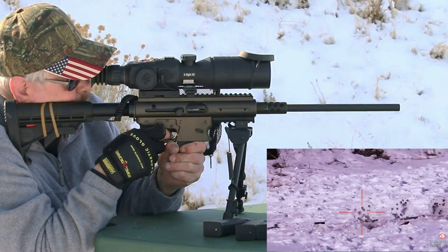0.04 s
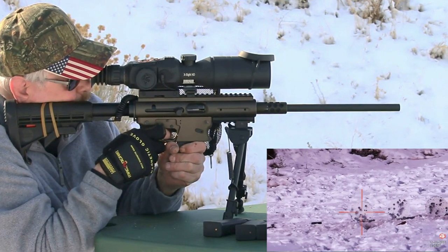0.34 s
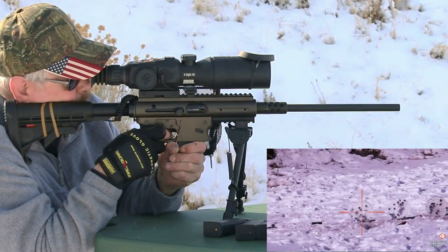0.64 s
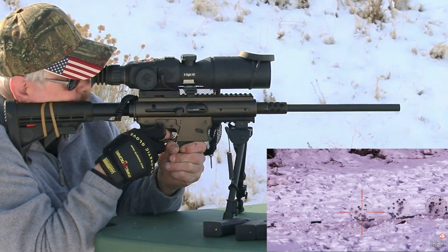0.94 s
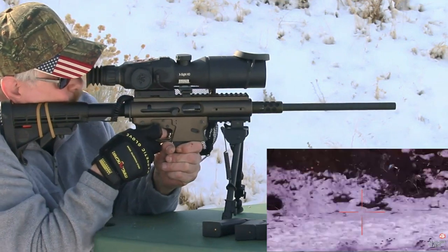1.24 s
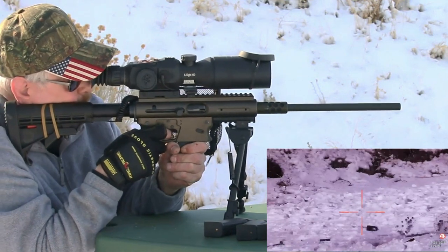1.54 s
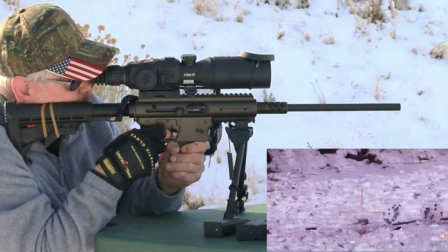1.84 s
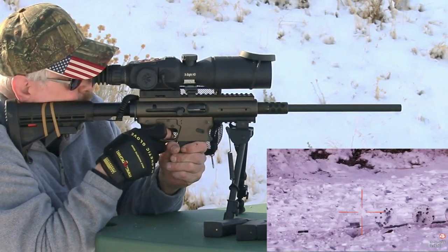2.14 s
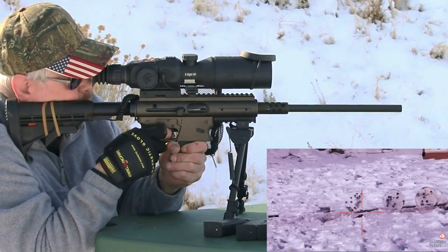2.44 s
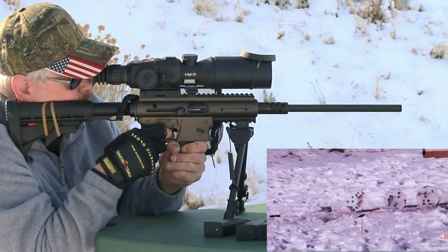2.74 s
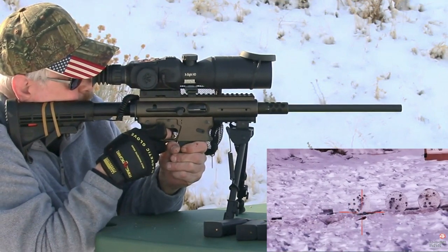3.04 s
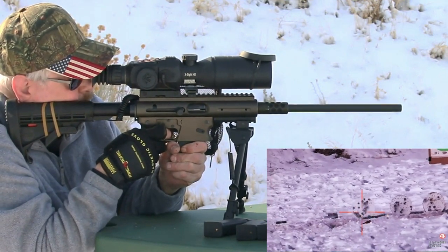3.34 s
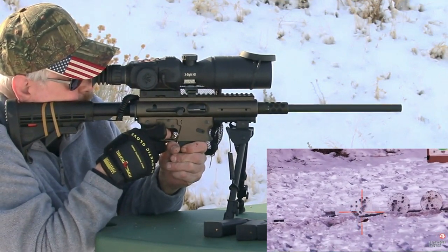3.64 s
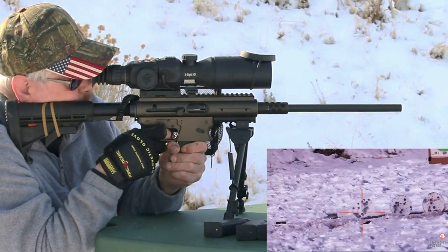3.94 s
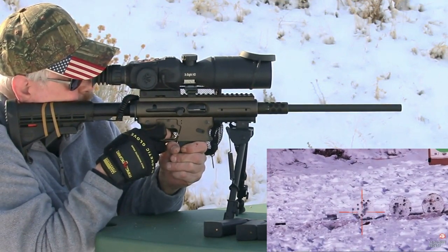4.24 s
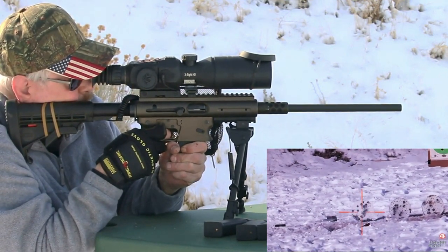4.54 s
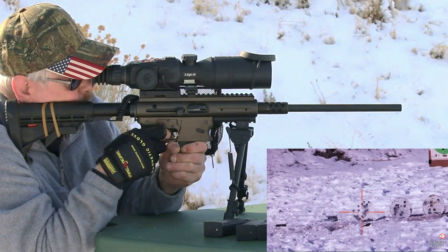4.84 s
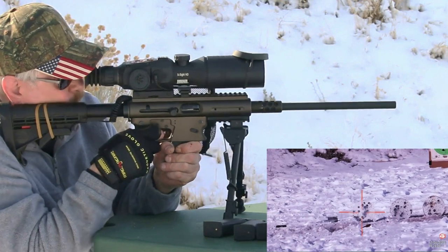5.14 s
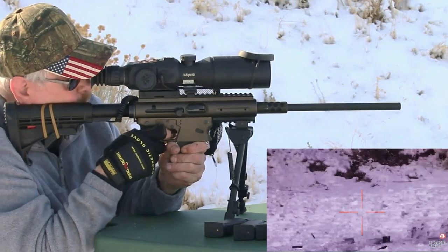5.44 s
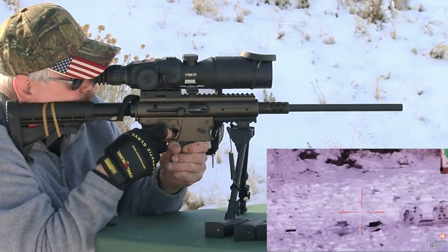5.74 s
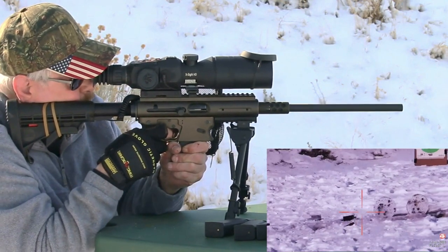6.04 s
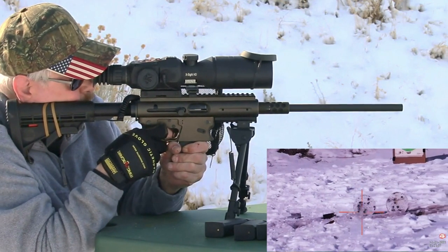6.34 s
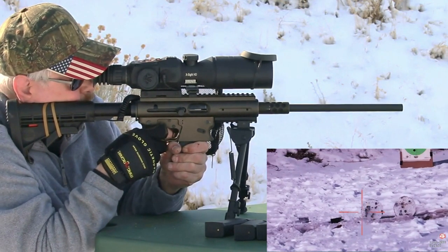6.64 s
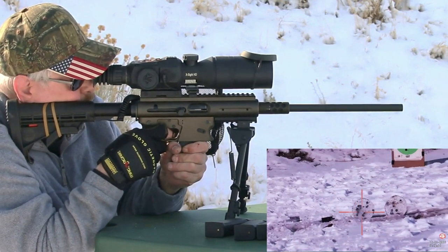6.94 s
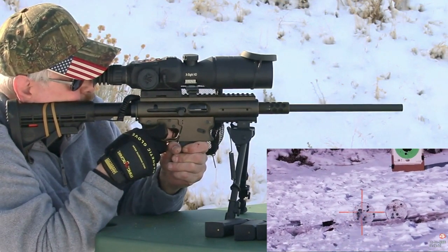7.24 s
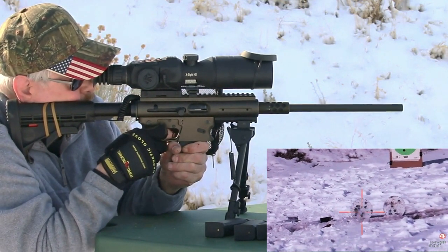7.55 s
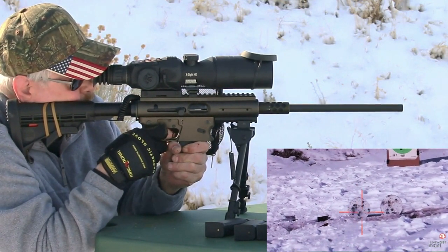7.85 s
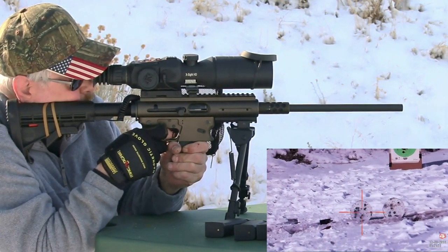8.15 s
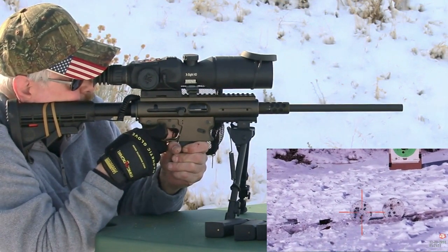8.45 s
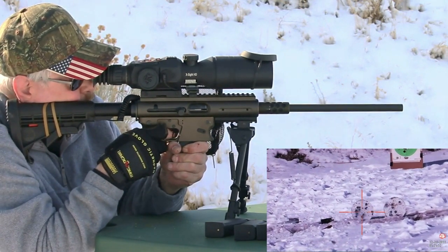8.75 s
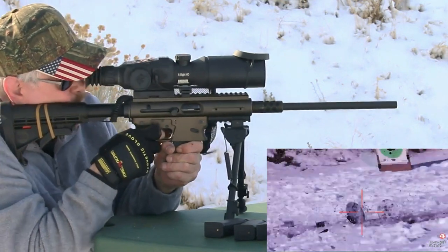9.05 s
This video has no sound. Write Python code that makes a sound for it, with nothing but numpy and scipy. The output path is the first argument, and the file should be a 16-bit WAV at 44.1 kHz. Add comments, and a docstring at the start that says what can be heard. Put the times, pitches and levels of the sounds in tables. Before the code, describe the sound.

Open country air and a faint, distant low drone sit under the high, pulsing ring of a steel target struck earlier. Light wind thumps on the microphone, mostly on the right. At about 1.2 seconds a close rifle fires with a sharp, overloading bang. The bullet cracks against the steel an instant later, a faint ricochet whines downward, and the echo slaps back and rumbles off the hills. The plate rings on, swelling and dipping about once a second. Wind puffs and soft handling clicks follow from 2 to 4.5 seconds. A second shot comes at 5.1 seconds, with the same echo, renewed ringing and a faint tinkle of metal. A small metallic clink sounds near 7.1 seconds. The third shot lands at about 9 seconds and sets the plate ringing loudest.

```python
"""Three shots on a snowy range

A carbine fires three times from a bench, overloading the microphone. Each bullet strikes a hanging
steel plate, fragments spatter, hard faces slap the bang back, and a slope and far hills roll it away.
The swinging plate rings with a slow beat, and is still singing from an earlier hit at the start.
Light wind puffs on the microphone over a far, low drone; between shots, handling makes soft clicks."""
import sys
import numpy as np
from scipy import signal
from scipy.fft import irfft, next_fast_len
from scipy.io import wavfile
from scipy.ndimage import map_coordinates

SR = 44100
rng = np.random.default_rng(int(sys.argv[2]) if len(sys.argv) > 2 else 0)


def master(y):
    """Save y as 16-bit WAV."""
    cut = np.clip(np.atleast_2d(y).T, -1, 1)
    pcm = np.round(cut * 32767)  # scale
    wavfile.write(sys.argv[1], SR, pcm.astype(np.int16))


N = 409248
TIME = np.arange(N) / SR


def amp(db):
    """Turn decibels into a gain. A fade time (t60) is the seconds a sound takes to drop 60 dB."""
    return 10 ** (np.asarray(db) / 20)


def unit(x):
    """Scale to an average (rms) level of 1."""
    return x / np.sqrt(np.mean(x ** 2) + 1e-20)


def along(points, hz):
    """Read between (Hz, value) points on a log scale."""
    f, v = np.transpose(points)
    return np.interp(np.log(hz + 1), np.log(f + 1), v)


def clock(seconds):
    """Sample times for about this many seconds."""
    return np.arange(next_fast_len(int(seconds * SR))) / SR


def wobble(t, rate):
    """A smooth curve through `rate` random values a second."""
    return map_coordinates(rng.standard_normal(4096), [t * rate], mode="wrap")


# How alike left and right sound. Each row: frequency in Hz, likeness (1 is identical).
LIKENESS = [(60, 0.89), (130, 1), (290, .98), (640, 0.93), (1410, 0.99), (3100, 0), (7000, 0.15),
            (15000, 0.72)]
def noise(t, gain, alike=LIKENESS):
    """Stereo noise with a given gain and likeness at each frequency."""
    hz = np.fft.rfftfreq(len(t), 1 / SR)
    turn = np.arccos(np.clip(along(alike, hz), -1, 1)) / 2
    phases = np.exp(2j * np.pi * rng.random((2, len(hz))))
    mid, side = irfft(phases * gain(hz) * [np.cos(turn), np.sin(turn)], len(t))
    return unit(np.array([mid + side, mid - side]))


def colour(points):
    """A tone shape from (Hz, dB) points."""
    return lambda hz: amp(along(points, hz))


def hump(centre_hz, octaves):
    """A tone shape with one broad peak."""
    return lambda hz: 1 / (1 + (np.log2((hz + 1) / centre_hz) / octaves) ** 2 / 2) ** 2


def add(out, s, sound):
    """Mix a sound in at s seconds."""
    start = round(s * SR)
    part = sound[:, max(-start, 0):max(N - start, 0)]
    out[:, max(start, 0):][:, :part.shape[1]] += part


# The air's tone. Each row: frequency in Hz, relative level in dB.
AIR_TONE = [(25, -11), (90, -6), (160, -17.5), (220, -7), (440, -9.5), (580, -6), (680, -7), (1000, -6),
            (1250, -12), (1900, -19.5), (11500, -27), (15500, -34)]
# The air's stereo width. Each row: frequency in Hz, left-right likeness.
AIR_LIKENESS = [(60, 1), (180, 0.66), (550, 0.92), (1650, 0.23), (4970, 0.085), (15000, 0.0)]
def open_air(db=-50):
    """The even rush of open country."""
    return noise(TIME, colour(AIR_TONE), AIR_LIKENESS) * amp(db + 0.4 * wobble(TIME, 2.5))


def drone(hz=185, start_db=-63, nearing_per_s=0.09):
    """A far, low drone grows as it comes nearer."""
    distance = np.maximum(1 - nearing_per_s * TIME, .1)
    return noise(TIME, hump(hz, 0.4)) * amp(start_db) / distance


# The breeze's tone. Each row: frequency in Hz, relative level in dB.
BREEZE_TONE = [(20, -10.5), (60, 7), (110, 0), (180, -14.5), (280, -24), (600, -45.5), (2000, -83)]
# Its rise and fall. Each row: time in seconds, relative level in dB.
BREEZE_LEVELS = [(0.0, -54), (1.47, -54), (1.6, -57), (2.22, -44), (2.56, -57.5), (2.82, -48.5),
                 (2.97, -47), (3.36, -50.5), (3.72, -58), (4.01, -50.5), (5.09, -48.5), (5.43, -56),
                 (5.66, -52.5), (7.39, -60), (8.58, -46), (9.28, -65)]
def breeze(boost_db=6, lump_db=2.5, sheltered_db=-15):
    """Wind rumbles on the microphone's right side; the left is sheltered."""
    rumble = noise(TIME, colour(BREEZE_TONE), [(100, .1)])
    db = np.interp(TIME, *np.transpose(BREEZE_LEVELS)) + boost_db + lump_db * wobble(TIME, 21)
    return rumble * amp(db) * amp([[sheltered_db], [0]])


# A puff's tone. Each row: frequency in Hz, relative level in dB.
PUFF_TONE = [(20, -15), (60, 4), (120, 3.5), (190, -7), (280, -23), (600, -54), (2000, -68.5)]
# The strongest puffs. Each row: peak time in seconds, level in dB, width in seconds.
PUFFS = [(0.311, -30.5, .009), (0.753, -20.5, .012), (2.129, -31.5, 0.053), (2.257, -25, 0.039),
         (3.183, -32, 0.041), (3.336, -29.5, 0.022), (3.505, -33.5, 0.038), (3.948, -35.5, 0.012),
         (4.109, -36.5, 0.069), (4.302, -34, 0.029), (7.779, -37, .03), (8.402, -21, 0.0057)]
def wind_puffs(sheltered_db=-22):
    """Swirls of air thud on the microphone, mostly on the right."""
    out, t = np.zeros((2, N)), clock(.5)
    middle = t[-1] / 2
    for s, db, width in PUFFS:
        swell = np.exp(-((t - middle) / width) ** 2 / 2)
        swirl = unit(noise(t, colour(PUFF_TONE), [(100, 0.62)]) * swell) * np.sqrt(np.mean(swell ** 2))
        add(out, s - middle, swirl * amp(db) * amp([[sheltered_db], [0]]))
    return out


# The plate's notes; close pairs flutter. Each row: pitch in Hz, relative level in dB, fade in seconds.
PLATE_NOTES = [(1315, -34.5, 8.93), (1319.0, -56.5, 8.1), (1340, -44.5, 9), (1846, -62, 1.2),
               (2093, -31.5, 1.3), (2410, -51, 1.7), (2552, -64, 1.7)]
# How it aims its ring, left then right. Each row: edge-on dip in dB, a power that delays the swell.
PLATE_AIM = [(-8, 2.1), (-18, 1.4)]
def plate(swing_hz=1.085, edge_on_s=0.836, doppler=.7, shimmer=.15, face_db=-2.5, earlier_hit_s=-2.664):
    """The struck steel rings as it swings, dipping each time it turns edge-on."""
    out, t = np.zeros((2, N)), clock(5)
    swing = swing_hz * (t - edge_on_s)
    facing = [amp(dip) + (1 - amp(dip)) * np.sin(np.pi * (swing % 1) ** late) for dip, late in PLATE_AIM]
    beam = amp(face_db) * np.array(facing) * (1 - np.exp(-t / .003))
    hits = [(s + delay, db) for s, _, db, delay, *_ in SHOTS]
    for s, hit_db in [(earlier_hit_s, 0)] + hits:
        # the swing and the moving air bend the notes, the high ones most
        bend = (doppler * np.sin(2 * np.pi * swing) + shimmer * wobble(t, 16)) / PLATE_NOTES[0][0]
        ring = sum(amp(db - 60 * t / t60) * np.sin(2 * np.pi * hz * t + bend * hz)
                   for hz, db, t60 in PLATE_NOTES)
        add(out, s, amp(hit_db) * beam * ring)
    return out


def hammer(db=-23, t60=.025):
    """The hammer snaps onto the firing pin."""
    t = clock(.03)
    return noise(t, hump(2500, 1.8)) * amp(db - 60 * t / t60) * (1 - np.exp(-t / 0.00077))


# The muzzle gas's tone. Each row: frequency in Hz, relative level in dB.
GAS_TONE = [(30, -8.5), (120, -13.5), (300, 3), (500, -12.5), (750, 5), (1500, -8), (2400, 0.5), (2900, -5),
            (3300, 0.5), (4800, -8), (6900, -11.5), (8500, -10.5), (15000, -28)]
def blast(bark_db=-3, bark_hz=760, bark_t60=0.027, thump_db=3, thump_hz=255, thump_t60=0.033):
    """Gas bursts from the muzzle over a hollow bark and a low thump."""
    t = clock(.06)
    gas = noise(t, colour(GAS_TONE), [(300, .97), (2000, .75), (8000, .55)]) * amp(13.5 - 60 * t / .0115)
    bark = noise(t, hump(bark_hz, 0.94)) * amp(bark_db - 60 * t / bark_t60)
    thump = np.sin(2 * np.pi * thump_hz * t + np.pi / 4) * amp(thump_db - 60 * t / thump_t60)
    return gas + bark + thump


# The nearest echo's tone. Each row: frequency in Hz, relative level in dB.
GROUND_TONE = [(40, -31), (120, -18.5), (285, -1), (600, -19.5), (1060, -0.5), (1380, -3), (1790, -15),
               (2400, -7), (5200, -17.5), (9000, -22.5), (15000, -30)]
def ground_echo(db=-16, hold_s=.031, t60=0.067):
    """The bang scatters off bench and ground, holds briefly, then dies."""
    t = clock(.2)
    fade = amp(db - 60 * np.maximum(t - hold_s, 0) / t60)
    return noise(t, colour(GROUND_TONE)) * fade * amp(0.5 * wobble(t, 400))


def roll(tone, fades, rise_s, lump_db, lump_rate):
    """Uneven land returns a lumpy echo; each frequency fades at its own speed."""
    t = clock(3)
    hz, age, bands = signal.stft(noise(t, colour(tone)), SR, nperseg=512)
    bands *= amp(-60 * age / along(fades, hz)[:, None])
    tail = signal.istft(bands, SR, nperseg=512)[1][:, :len(t)]
    return tail * (1 - np.exp(-(t / rise_s) ** 2)) * amp(lump_db * wobble(t, lump_rate))


# The slope's tone. Each row: frequency in Hz, relative level in dB.
SLOPE_TONE = [(50, -24), (150, -9.5), (290, 3.5), (480, -15.5), (800, -1.5), (1250, -2), (1800, -6.5),
              (2400, -5), (4000, -12.5), (8000, -19.5), (15000, -27.5)]
# How long it lasts. Each row: frequency in Hz, fade in seconds.
SLOPE_FADES = [(200, 1), (1200, 1.9), (2500, 1.1), (5000, 0.95), (12000, .5)]
def slope_echo(db=-26):
    """The bang rolls back off the slope."""
    return amp(db) * roll(SLOPE_TONE, SLOPE_FADES, rise_s=0.042, lump_db=2.0, lump_rate=100)


# The shots. Each row: start in seconds, echo gain in dB, plate gain in dB, seconds until the strike
# is heard, strike gain in dB, strike pitch in Hz, spatter gain in dB, slap gain in dB.
SHOTS = [(1.1565, 1.5, 0.7, .1237, 1, 2600, 0, 0), (5.14, 1.5, 1.4, .123, -9, 5000, -7, 1),
         (9.0503, 3.1, 11, .1221, -1, 1400, -3, -2)]
def gunshots(hammer_lead_s=.0028):
    """The hammer falls, the gun fires, and the ground and slope answer."""
    out = np.zeros((2, N))
    for s, echo_db, *_ in SHOTS:
        add(out, s - hammer_lead_s, hammer())
        add(out, s, blast())
        add(out, s, amp(echo_db) * ground_echo())
        add(out, s, amp(echo_db) * slope_echo())
    return out


def knocks(rows, spike_db=3, rattle_db=-2, scatter_db=-3, scatter_t60=.17, left_lag_s=.0001):
    """Each knock is a sharp spike, a short rattle and a wash of scattered sound."""
    out, t = np.zeros((2, N)), clock(.25)
    age = np.maximum(t - [[left_lag_s], [0]], 0)
    for s, db, hz, octaves, t60 in rows:
        progress = np.pi * hz * octaves * age  # a broader tone rises and dies sooner
        spike = -np.sin(2 * np.pi * hz * age) * progress * np.exp(1 - progress) * amp(spike_db)
        tone, fade = hump(hz, octaves), amp(-60 * t / t60)
        rattle = unit(noise(t, tone, [(1500, 0.62), (8000, 0.25)]) * fade)
        rattle *= amp(rattle_db) * np.sqrt(np.mean(fade ** 2))
        scatter = noise(t, tone) * np.sqrt(t60 / scatter_t60) * amp(scatter_db - 60 * t / scatter_t60)
        onset = 1 - np.exp(-2 * hz * t)
        add(out, s, amp(db) * (spike + (rattle + scatter) * onset))
    return out


def bullet_strikes(octaves=1.2, t60=.003):
    """Each bullet cracks against the steel."""
    rows = [(s + delay, db, hz, octaves, t60) for s, _, _, delay, db, hz, *_ in SHOTS]
    return knocks(rows, rattle_db=-4, scatter_db=-8)


# The first bullet's whine: start in seconds, level in dB, lowest and highest starting pitch in Hz.
RICOCHET = (1.28, -36, 3900, 7001)
def ricochet(count=5, slowing=1.7, rise_s=0.078, t60=1.0, flutter=1.1):
    """Spinning fragments whine, falling in pitch as the air slows them; higher ones are fainter."""
    out, t = np.zeros((2, N)), clock(.6)
    s, db, low_hz, high_hz = RICOCHET
    fade = amp(db - 60 * t / t60) * (1 - np.exp(-(t / rise_s) ** 2))
    for hz in np.geomspace(low_hz, high_hz, count):
        phase = 2 * np.pi * np.cumsum(hz / (1 + slowing * t)) / SR
        spin = flutter * np.array([wobble(t, 153), wobble(t, 151)])
        add(out, s, fade * (low_hz / hz) ** 2 * np.sin(phase + spin))
    return out


# Spent brass and loose metal. Each row: start in seconds, pitch in Hz, level in dB, fade in seconds.
PINGS = [(1.281, 5060, -37, .5), (3.631, 1760, -55, .25), (5.399, 4330, -50, .75), (5.37, 6780, -54, .5),
         (7.123, 3727, -29, .08), (7.123, 1560, -39, .08), (7.123, 2221, -48, .25)]
def pings(tumble_db=3, tumble_rate=70):
    """Small metal parts ring, flickering as they tumble."""
    out, t = np.zeros((2, N)), clock(.6)
    for s, hz, db, t60 in PINGS:
        tumble, drift = np.reshape([wobble(t, tumble_rate) for _ in range(4)], (2, 2, -1))
        add(out, s, amp(db - 60 * t / t60 + tumble_db * tumble) * np.sin(2 * np.pi * hz * t + drift))
    return out


# Fragments landing. Each row: seconds after the strike, relative level in dB, pitch in Hz,
# width in octaves, fade in seconds.
SPATTER = [(.005, -19, 4500, 1.2, .02), (.026, -22, 2600, 1.1, .035)]
def spatter():
    """Bits of bullet land just after each strike."""
    return knocks([(s + delay + after, gain_db + db, *tone)
                   for s, _, _, delay, _, _, gain_db, _ in SHOTS for after, db, *tone in SPATTER])


# Sharp echoes. Each row: seconds after the shot, relative level in dB, pitch in Hz,
# width in octaves, fade in seconds.
SLAPS = [(.1870, -9.5, 2000, .45, .021), (.1872, -21, 6800, .9, .012), (.218, -25, 3300, .7, .025),
         (.259, -19, 1550, .65, .025)]
def slaps():
    """Hard faces down the range slap each bang back."""
    return knocks([(s + after, gain_db + db, *tone)
                   for s, *_, gain_db in SHOTS for after, db, *tone in SLAPS])


# The hills' tone. Each row: frequency in Hz, relative level in dB.
HILL_TONE = [(30, -30), (70, -13), (140, -6.5), (250, 1), (330, -1), (470, -18.5), (780, -8.5),
             (1250, -1.5), (1800, -18), (3000, -22.5), (8000, -54)]
# How long it lasts. Each row: frequency in Hz, fade in seconds.
HILL_FADES = [(80, 5.3), (250, 2.3), (600, 1.96), (1200, 0.77), (2500, 0.86), (6000, 0.47)]
def hill_echoes(db=-22, delay_s=.21):
    """Far hills return each bang as a late, deep rumble."""
    out = np.zeros((2, N))
    for s, echo_db, *_ in SHOTS:
        rumble = roll(HILL_TONE, HILL_FADES, rise_s=0.069, lump_db=1.55, lump_rate=31)
        add(out, s + delay_s, amp(echo_db + db) * rumble)
    return out


# Small clicks. Each row: start in seconds, relative level in dB, pitch in Hz, width in octaves,
# fade in seconds.
CLICKS = [(1.543, -37, 2880, 0.7, 0.024), (1.660, -50.5, 4850, .7, 0.068), (2.4646, -52.5, 8000, .7, 0.14),
          (2.788, -50.5, 2580, 1.2, 0.069), (3.631, -51.5, 2400, 2.3, .07), (4.4915, -41, 1840, 1.2, 0.032),
          (5.604, -28, 2200, 1.6, 0.01), (6.301, -41, 1770, 0.77, 0.033), (6.345, -52, 2450, 1.7, .06),
          (7.117, -35.5, 1700, 0.92, .08), (8.3855, -37.5, 1600, 1.7, 0.0067)]
def handling():
    """Spent cases and the handled gun click softly."""
    return knocks(CLICKS, spike_db=8, rattle_db=2, scatter_db=2.5, scatter_t60=0.21)


def scene():
    """Everything that reaches the microphone."""
    background = open_air() + drone() + breeze() + wind_puffs()
    shooting = plate() + gunshots() + bullet_strikes() + ricochet() + pings() + spatter()
    return background + shooting + slaps() + hill_echoes() + handling()


def record(dry, top_hz=15800):
    """The recorder clips the loudest peaks and cuts the highest treble."""
    low_pass = signal.butter(16, top_hz, fs=SR, output="sos")
    return signal.sosfiltfilt(low_pass, np.clip(dry, -1, 1))


dry = scene()
out = record(dry)
master(out)
```